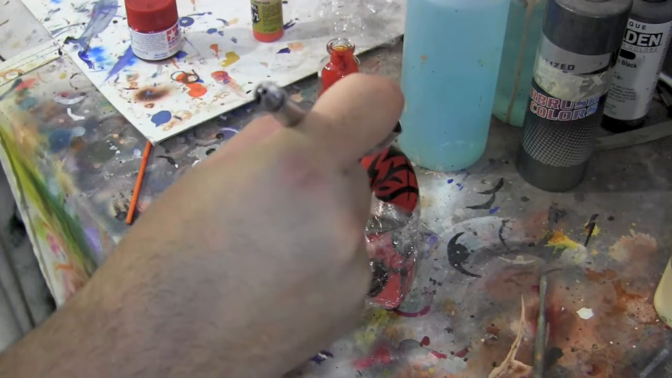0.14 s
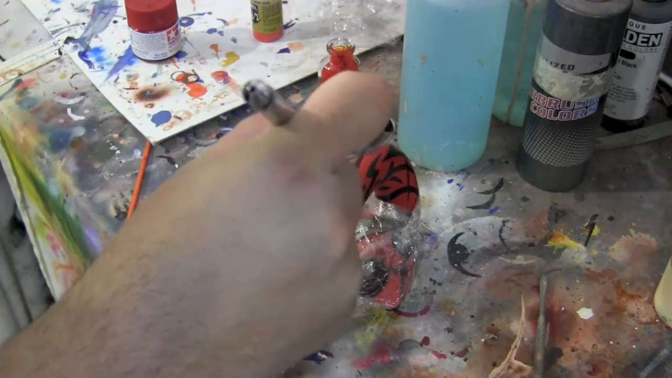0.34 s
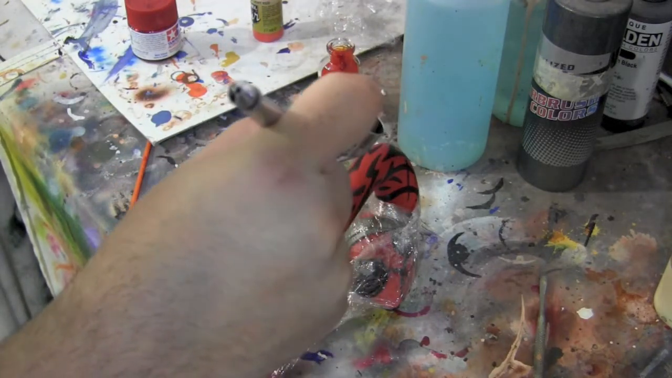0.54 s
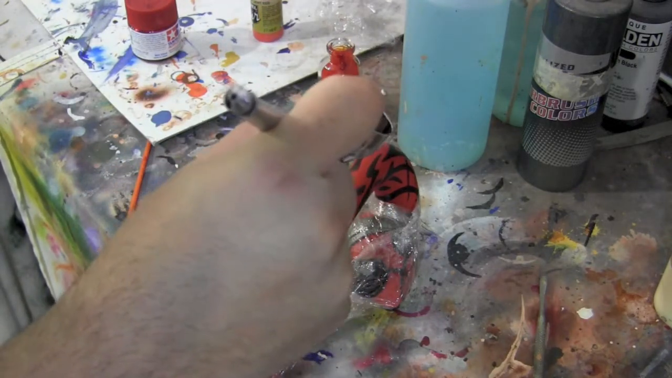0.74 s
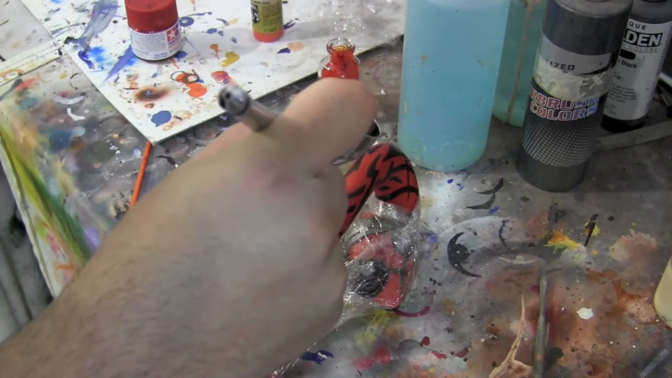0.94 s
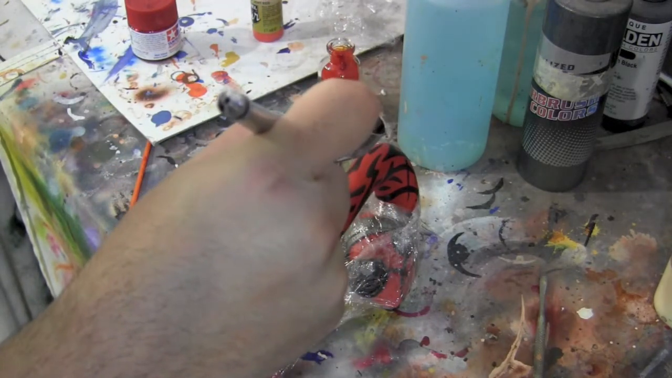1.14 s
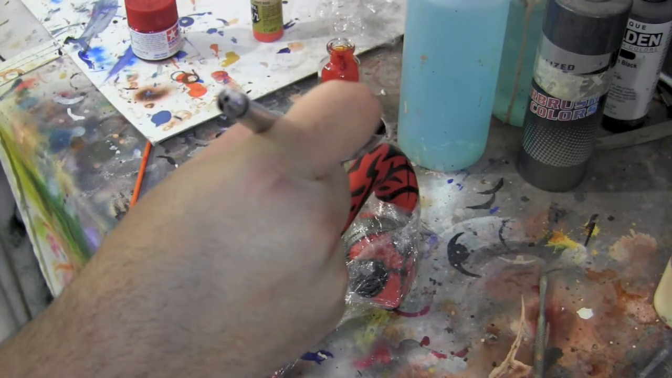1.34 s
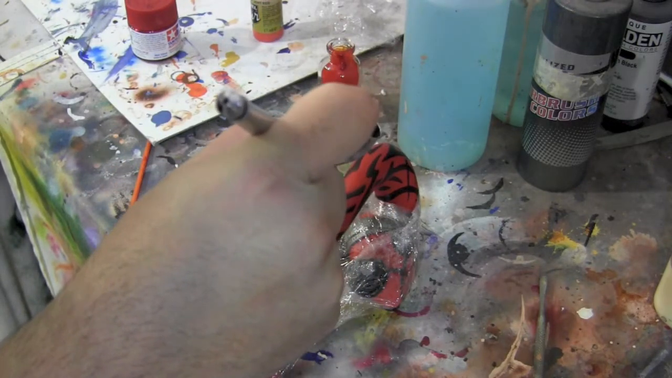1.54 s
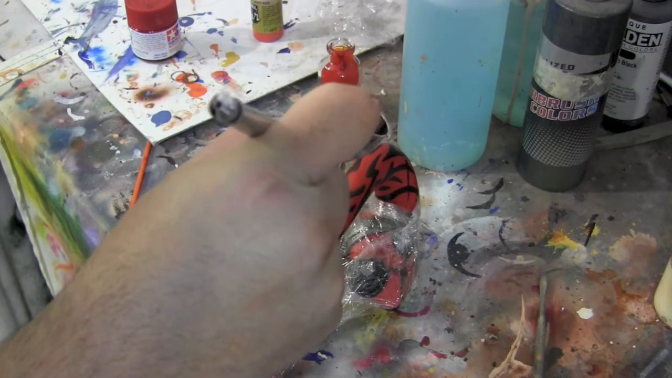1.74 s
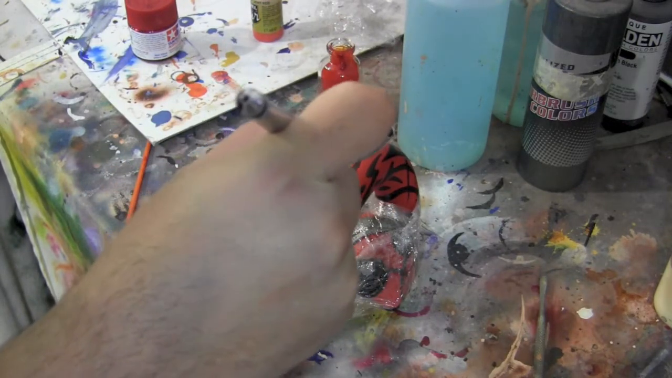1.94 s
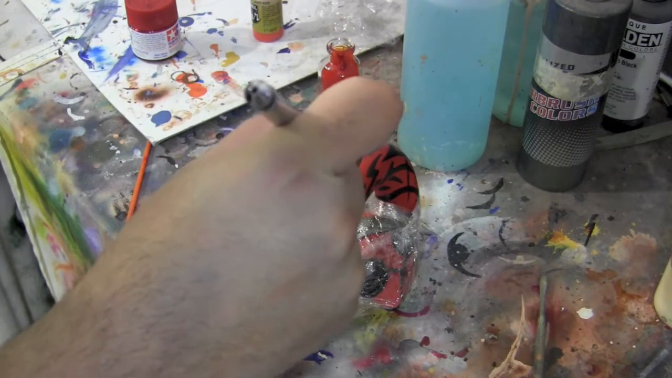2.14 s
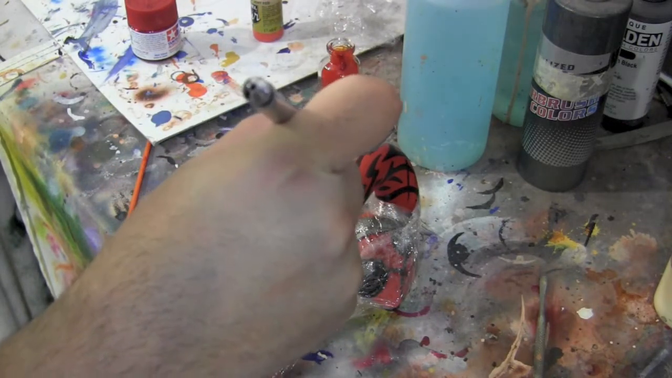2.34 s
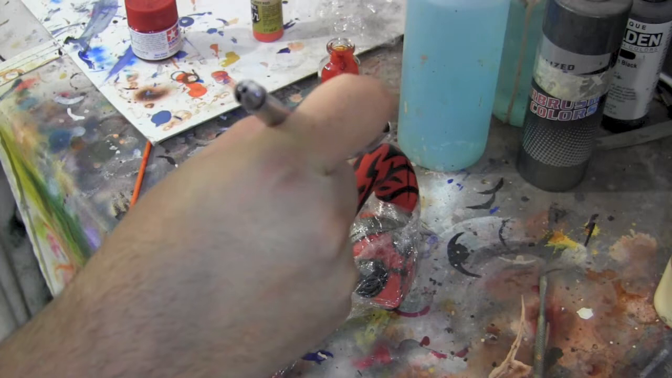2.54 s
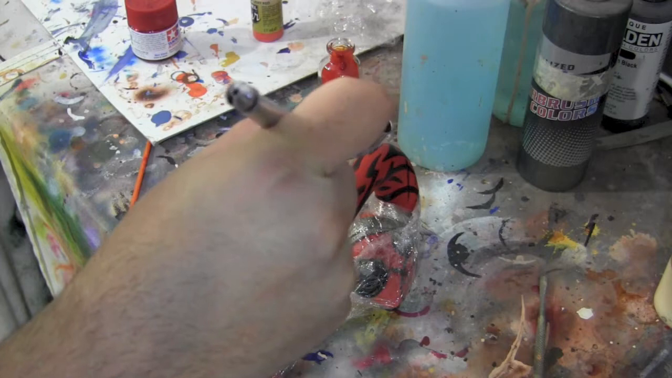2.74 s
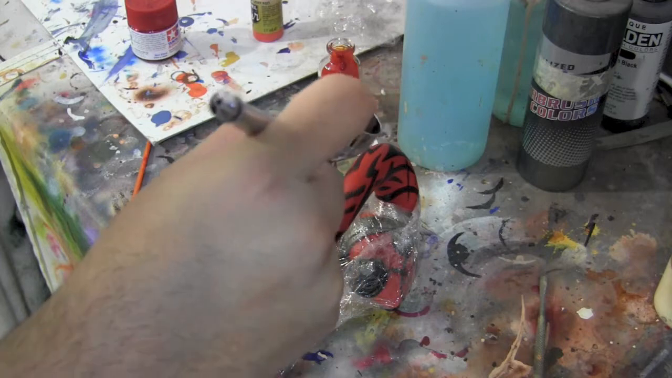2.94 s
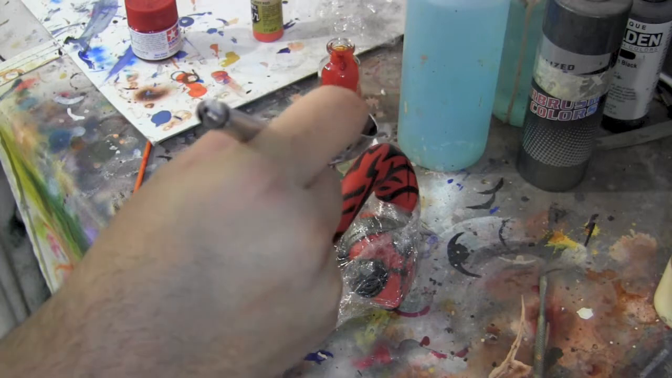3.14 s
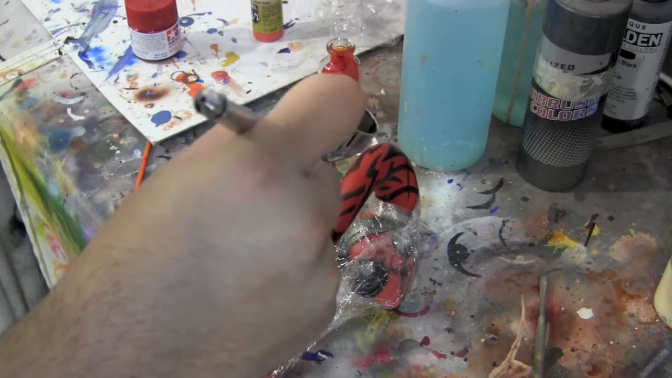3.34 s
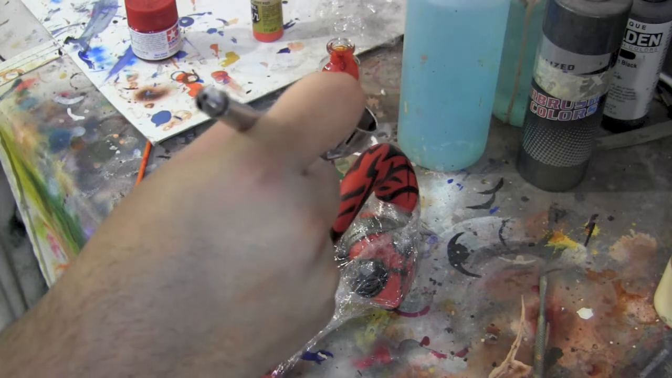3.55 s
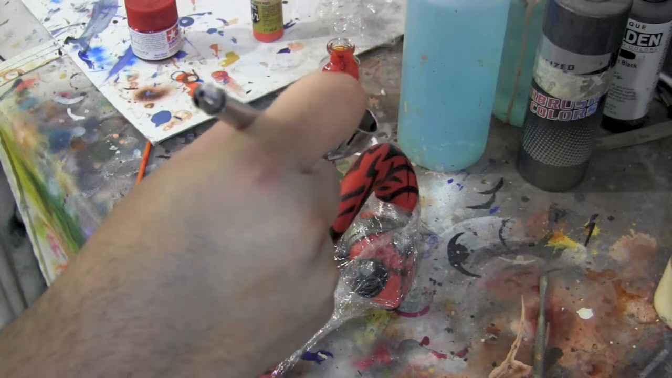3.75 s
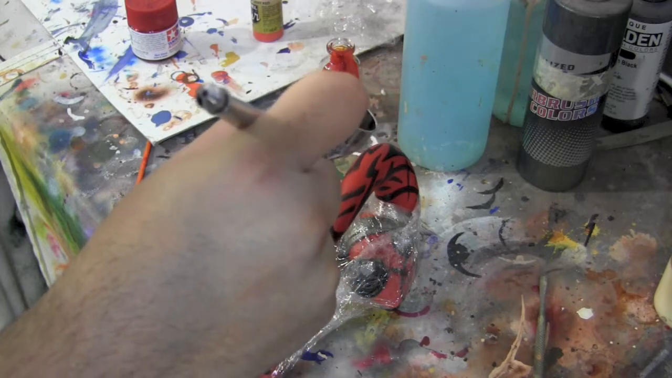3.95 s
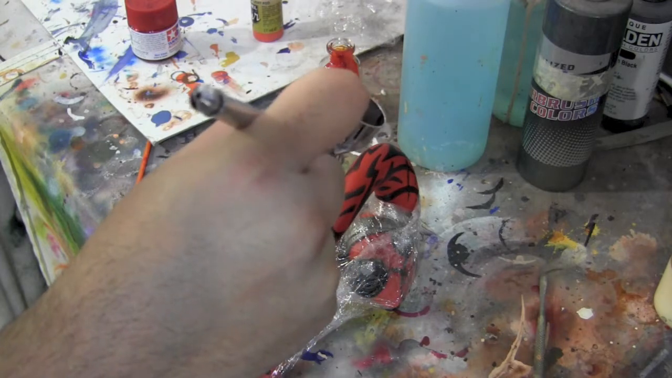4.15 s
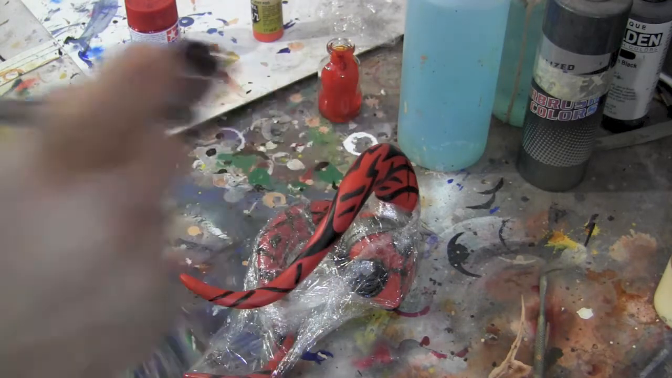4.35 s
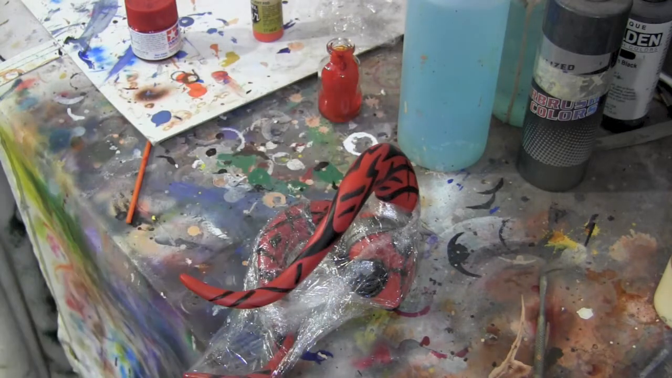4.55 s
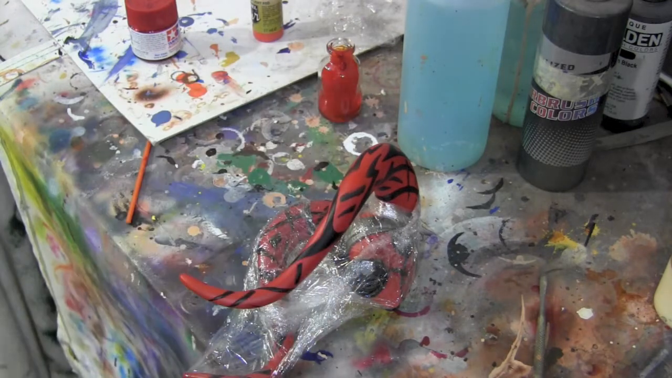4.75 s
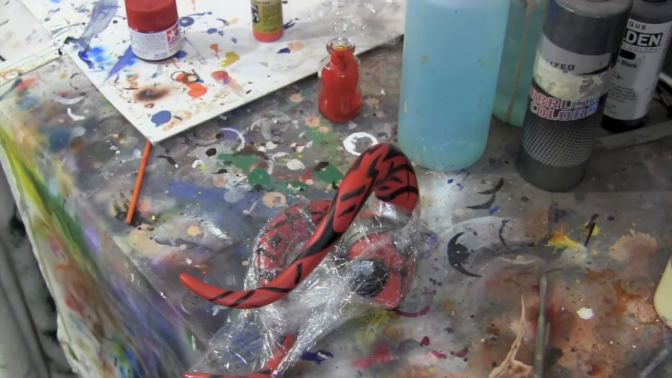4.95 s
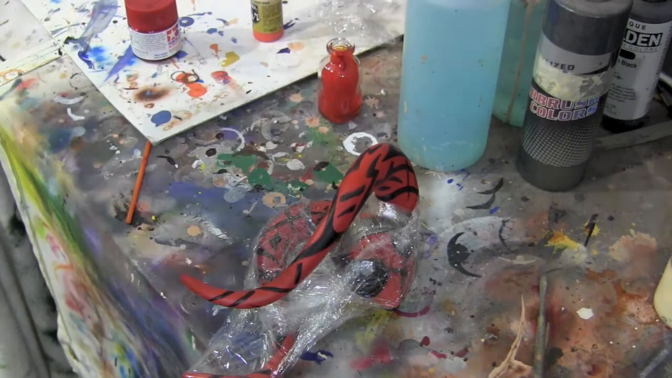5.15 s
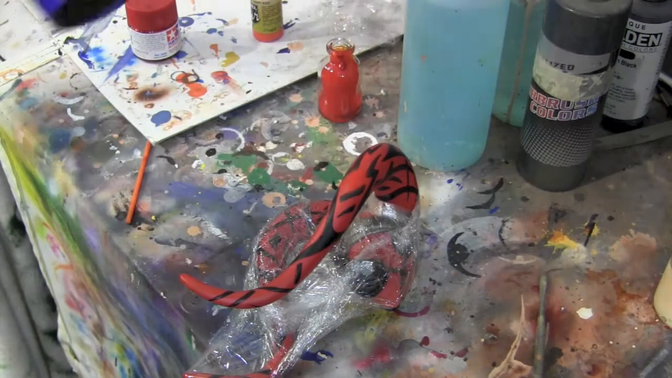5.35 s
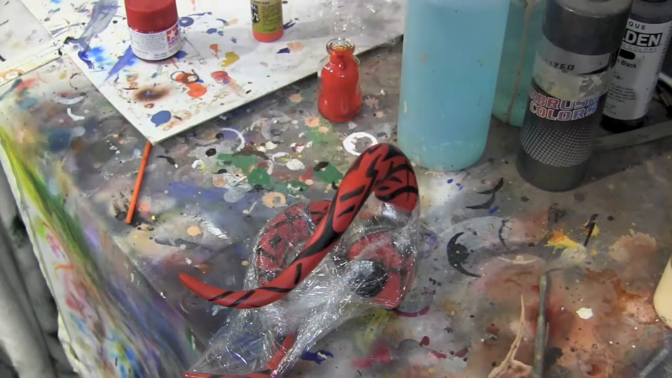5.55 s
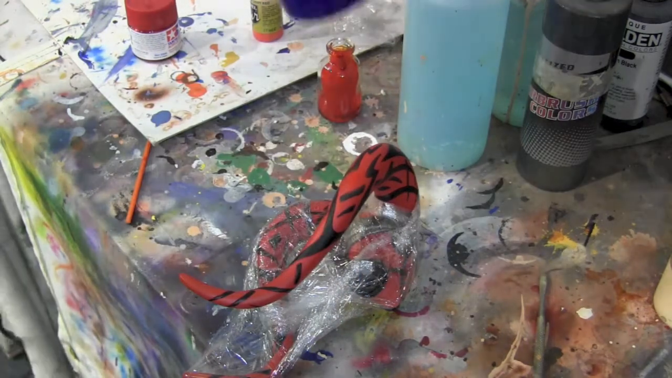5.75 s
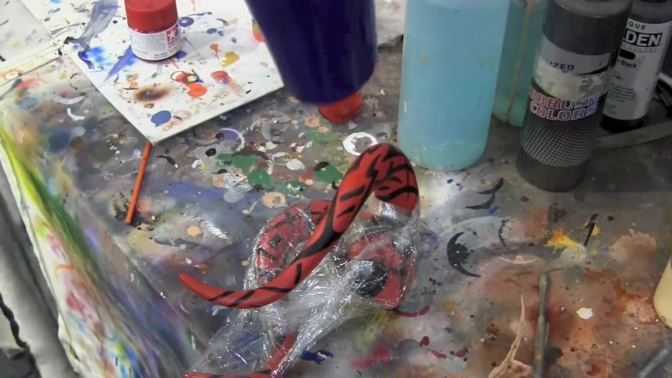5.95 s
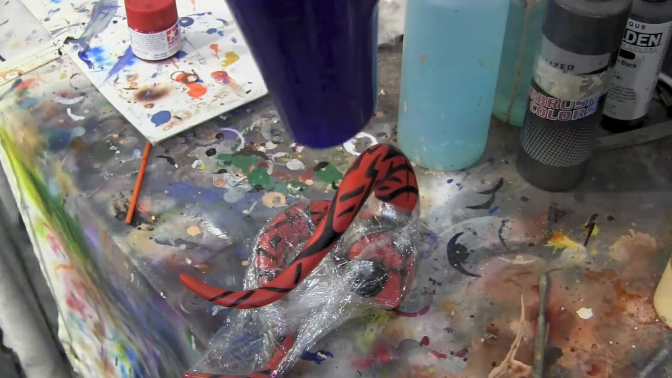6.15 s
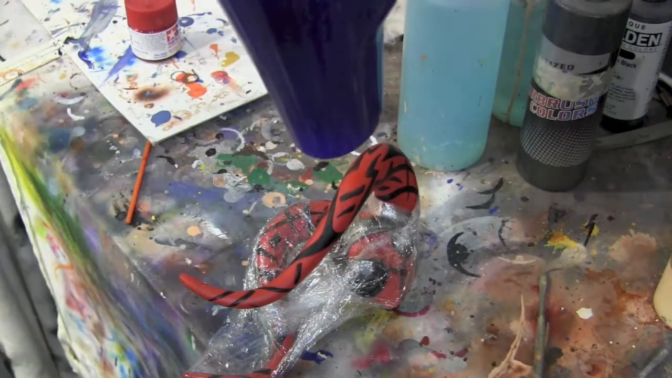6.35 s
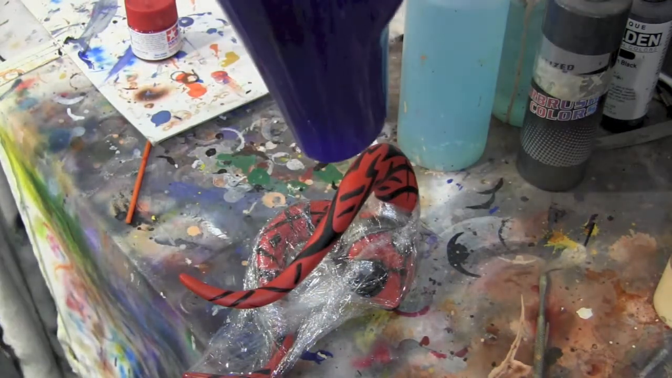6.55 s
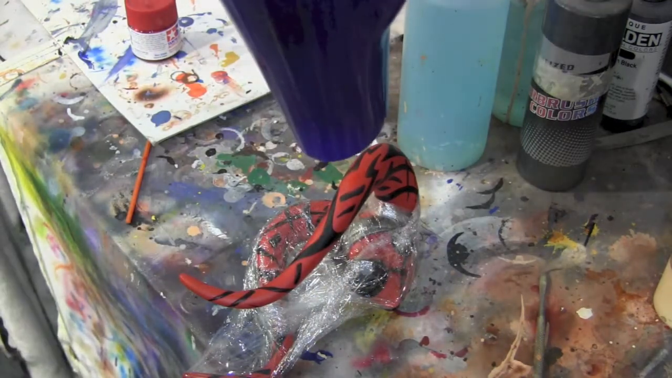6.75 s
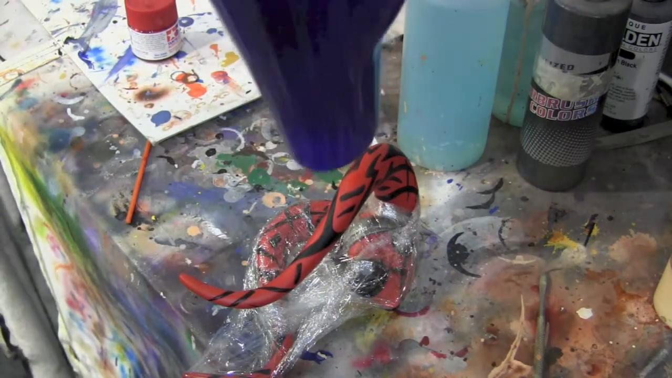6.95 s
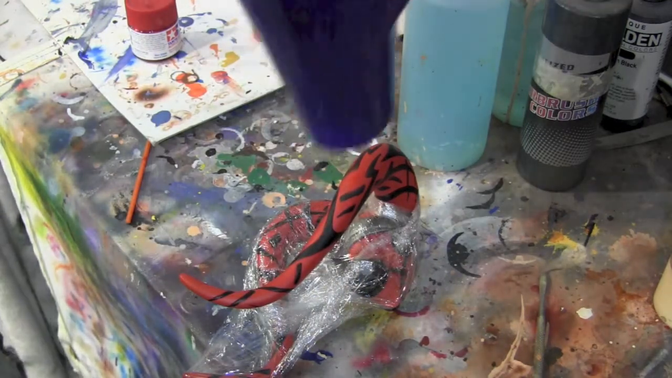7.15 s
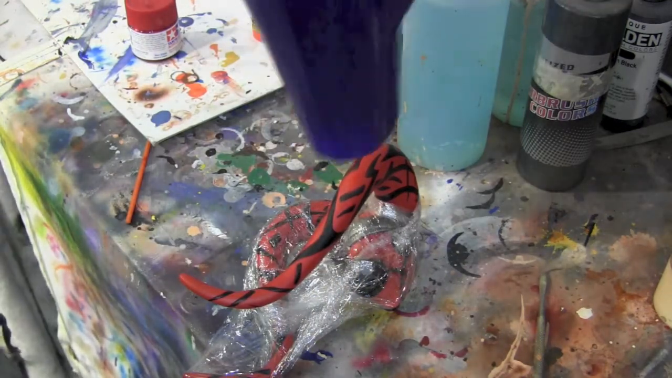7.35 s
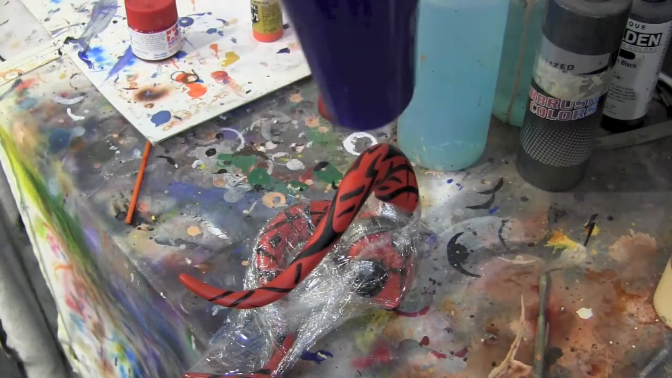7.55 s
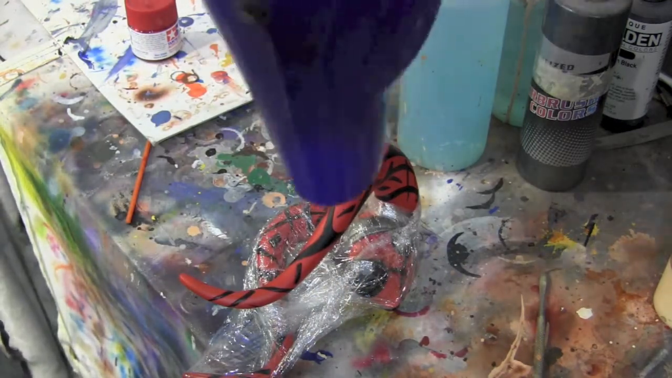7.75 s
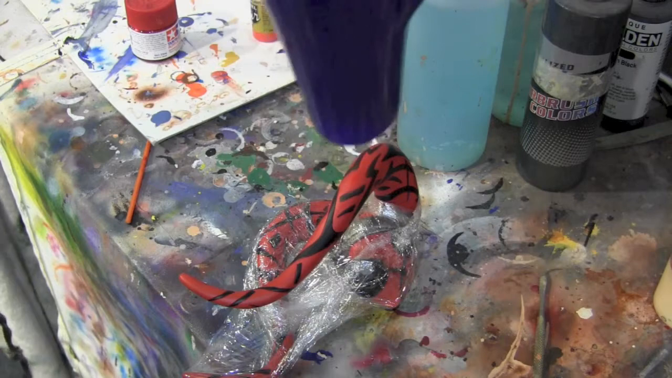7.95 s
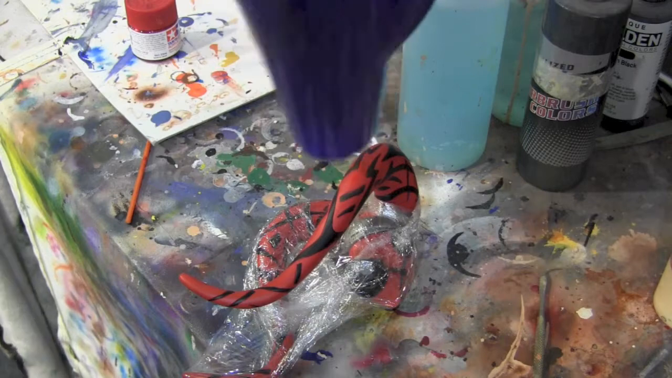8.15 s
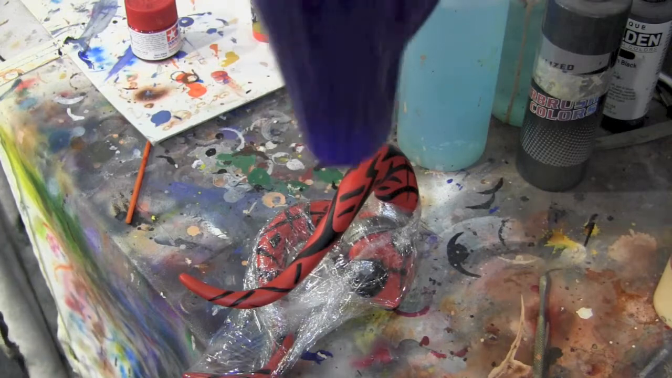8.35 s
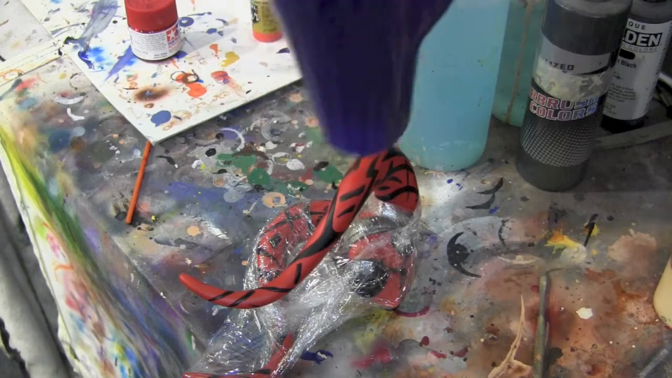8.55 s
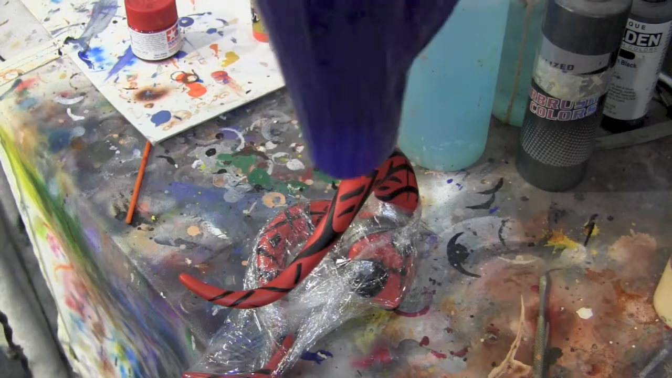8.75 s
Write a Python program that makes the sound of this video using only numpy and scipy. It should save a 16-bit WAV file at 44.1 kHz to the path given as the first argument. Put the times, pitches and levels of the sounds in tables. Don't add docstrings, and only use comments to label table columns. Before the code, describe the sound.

A small room, miked closely in stereo, with faint ventilation and hiss. From 0 to 4.2 seconds an airbrush gives twelve short spurts, each a tenth to a sixth of a second, roughly every third of a second: soft breathy puffs with thin high whistles, starting and stopping abruptly. The later ones are slightly stronger and hissier. At 2.83 a tiny falling wet squeak; at 3.0 a loud, bright metallic trigger click. The spurts pause until about 3.5. At 4.3 a softer latch click, then light rustling and ticks, a small knock at 4.55 and a firmer double knock on the bench around 4.9 to 5.0. Quiet shuffling follows. At 5.86 a hollow switch clack; brushes scrape scratchily while a motor winds up within a second. By 7 a hair dryer blows at a loud, steady roar, broad air rush with a blade whine near 1200 hertz, slightly fuller toward the end at about 9.

```python
import sys
import numpy as np
from scipy import signal
from scipy.fft import rfft, irfft, next_fast_len
from scipy.io import wavfile
from scipy.ndimage import uniform_filter1d

SR = 44100
rng = np.random.default_rng(int(sys.argv[2]) if len(sys.argv) > 2 else 0)


def makeup_ratio(level_db):
    decades = np.asarray(level_db, float) / 20
    return 10 ** decades


def log_audio(samples):
    frames = np.atleast_2d(samples).T
    limited = np.clip(frames, -1, 1)
    pcm = np.round(limited * 32767).astype(np.int16)
    wavfile.write(sys.argv[1], SR, pcm)


N = 392049
T = np.arange(N) / SR


def level(x, db):
    return x * makeup_ratio(db) / np.sqrt(np.mean(x ** 2))


def read(table, hz):
    f, v = np.transpose(table)
    return np.interp(np.log(np.maximum(hz, 1)), np.log(f), v)


def resonance_db(hz, peaks):
    return sum(boost / (1 + (2 * (hz - centre) / width) ** 2) for centre, width, boost in peaks)


def colour(x, table, peaks=(), lo_hz=0, hi_hz=1e5):
    n = next_fast_len(len(x), True)
    f = np.fft.rfftfreq(n, 1 / SR) + 1e-3
    db = read(table, f) + resonance_db(f, peaks)
    edges = 1 / np.sqrt((1 + (lo_hz / f) ** 8) * (1 + (f / hi_hz) ** 8))
    return irfft(rfft(x, n) * makeup_ratio(db) * edges, n)[:len(x)]


def walk(rate_hz):
    knots = rng.standard_normal(int(N / SR * 200))
    joined = np.interp(T * min(rate_hz, 190), np.arange(len(knots)), knots)
    return 0.69 * uniform_filter1d(joined, int(SR / rate_hz / 2))


def glide(start_s, length_s, start_hz, end_hz):
    t = np.arange(int(length_s * SR)) / SR
    hz = start_hz + (end_hz - start_hz) * t / length_s
    return int(start_s * SR), np.sin(np.pi * t / length_s), 2 * np.pi * np.cumsum(hz) / SR


def strike(events, modes, contact_s, rattle_s, rattle):
    out, t = np.zeros(N), np.arange(SR // 3) / SR
    push = np.hanning(int(contact_s * SR) + 3)
    chance = rng.standard_normal((len(events), len(modes) + len(t)))
    for (start_s, db), row in zip(events, chance):
        ring = np.zeros(len(t))
        for (hz, mode_db, t60_s), c in zip(modes, row):
            ring += makeup_ratio(mode_db + 0.44 * c) * np.sin(2 * np.pi * hz * t) * 1000. ** (-t / t60_s)
        force = rattle * row[len(modes):] * 1000. ** (-t / rattle_s)
        force[0] = 1
        ring = signal.fftconvolve(np.convolve(ring, push), force)[:len(t)]
        a = int(start_s * SR)
        out[a:a + len(t)] += makeup_ratio(db) * ring / np.abs(ring).max()
    return out


def snap(events, table, t60_s):
    out, t = np.zeros(N), np.arange(2048) / SR
    for start_s, db in events:
        crack = colour(rng.standard_normal(len(t)), table) * 1000. ** (-t / t60_s)
        crack *= np.clip(t / 0.00017, 0, 1)
        a = int(start_s * SR)
        out[a:a + len(t)] += makeup_ratio(db) * crack / np.abs(crack).max()
    return out


def small_part(x):
    return signal.sosfilt(signal.butter(6, 1900, "high", fs=SR, output="sos"), x)


# pitch_hz, level_db (per Hz)
ROOM_TONE = [(15, -45), (25, -44), (132, -1), (178, -5.5), (368, -4.5), (469, -5.5), (1240, -9),
             (1620, -11.5), (1800, -9), (4140, -14), (4870, -16), (5720, -15.5), (15500, -28.5)]
# pitch_hz, level_db
HUM = [(60, -82), (133, -78)]
# pitch_hz, side_db (re mid)
TONE_WIDTH = [(60, -3), (110, -4), (200, 2.5), (380, 1.5), (700, 0.5), (1290, -2.5), (2380, -5), (4400, -7),
              (8120, -5.5), (15000, 2)]


def room_tone():
    mid, side = (level(colour(rng.standard_normal(N), ROOM_TONE) * makeup_ratio(1.2 * walk(3.3)), -62) for _ in range(2))
    hum = sum(makeup_ratio(db + 1.3 * walk(5)) * np.sin(2 * np.pi * hz * T) for hz, db in HUM)
    return mid + hum, colour(side, TONE_WIDTH)


# open_s (valve fully open), held_s, hiss_db, ring_db (of the figure, re hiss), opening_s
PRESSES = [(0.0, 0.062, -45, 6.5, .01), (0.306, 0.13, -45, 2.5, 0.018), (0.735, 0.11, -45.5, 4, .016),
           (1.059, 0.115, -44.5, 1, 0.0082), (1.409, 0.11, -45, -1, 0.011), (1.741, 0.11, -46, 0.5, 0.013),
           (2.163, 0.12, -45.5, 0, 0.013), (2.441, 0.17, -45.5, -2, 0.0067), (2.827, 0.14, -43, -11, 0.01),
           (3.467, 0.126, -44, -6, 0.024), (3.746, 0.17, -42.5, -10, 0.016),
           (4.073, 0.15, -42.5, -23, 0.016)]


def presses():
    opening_db, shut_db_per_s, top_shut_db_per_s = 23, 900, 300
    swell_db_per_s, top_swell_db_per_s, ring_fade_db_per_s, splash_fade_db_per_s = 12, 2, 48, 14
    out = np.full((4, N), -150.)
    for open_s, held_s, db, ring_db, opening_s in PRESSES:
        a = max(int((open_s - 2 * opening_s) * SR), 0)
        b = int((open_s + held_s + .05) * SR)
        t = T[a:b] - open_s
        along = np.clip(t, 0, held_s) - held_s / 2
        late = np.maximum(t - held_s, 0)
        jet = db + opening_db * np.minimum(t / opening_s, 0) - shut_db_per_s * late + swell_db_per_s * along
        splash = jet + 3.5 + 0.053 * ring_db - splash_fade_db_per_s * along
        ring = jet + ring_db - ring_fade_db_per_s * along
        top = jet + 3 + top_swell_db_per_s * along - top_shut_db_per_s * late
        out[:, a:b] = [jet, splash, ring, top]
    return out


# pitch_hz, level_db (per Hz)
SPRAY = [(59, -58), (100, -14), (205, -21), (362, -5), (476, -8.5), (742, 2), (1430, -6.5), (1590, -13.5),
         (2270, -5.5), (3320, -10), (3690, -8.5), (8050, -11), (10600, -13), (13900, -13.5), (15500, -36)]


def jet():
    noise = rng.standard_normal((3, N))
    splash = level(colour(noise[0], SPRAY, hi_hz=1620), 0) * makeup_ratio(0.22 * walk(60))
    ring = level(colour(noise[0], SPRAY, lo_hz=1480, hi_hz=2320), 0) * makeup_ratio(1.7 * walk(55))
    hiss = level(colour(noise[1], SPRAY, lo_hz=2560, hi_hz=8600), 0) * makeup_ratio(1.0 * walk(90))
    top = level(colour(noise[2], SPRAY, lo_hz=8500), 0) * makeup_ratio(1.1 * walk(82))
    return np.sum(makeup_ratio(presses()) * [hiss, splash, ring, top], axis=0)


# start_s, length_s, start_hz, end_hz, level_db
WHISTLES = [(0.018, 0.066, 7000, 7200, -43), (0.325, 0.11, 6730, 6950, -45),
            (0.781, 0.071, 6800, 7700, -41), (1.06, 0.062, 6900, 7300, -43),
            (1.458, 0.044, 6940, 7000, -49), (1.76, 0.1, 8500, 8800, -51), (2.19, 0.094, 9300, 9200, -44),
            (2.44, 0.047, 8850, 9200, -44), (2.496, .08, 6300, 6070, -43.5), (2.87, 0.1, 8800, 9000, -46),
            (3.484, .09, 8600, 8600, -49), (3.516, .07, 3700, 3810, -55), (3.764, 0.18, 10660, 10400, -43),
            (4.1, 0.081, 8500, 8500, -44), (4.141, 0.1, 3770, 3700, -57), (4.09, 0.137, 10400, 10500, -40),
            (3.47, .12, 12800, 12800, -49), (4.662, 0.043, 2410, 2370, -66), (5.824, .03, 700, 810, -56)]


def whistles():
    out = np.zeros(N)
    breath = rng.standard_normal(N) + 1j * rng.standard_normal(N)
    breath = uniform_filter1d(uniform_filter1d(breath, size=40), size=40)
    for start_s, length_s, start_hz, end_hz, db in WHISTLES:
        a, swell, turn = glide(start_s, length_s, start_hz, end_hz)
        b = a + len(turn)
        out[a:b] += swell * level(np.real(breath[a:b] * np.exp(1j * turn)), db)
    return out


# start_s, length_s, start_hz, end_hz, level_db, octave_db
SQUEAKS = [
    (2.824, 0.014, 5000, 4500, -30, -7),
    (2.84, .016, 4760, 4650, -38, -20),
    (2.849, 0.016, 3520, 2730, -33.5, -14),
]


def squeaks():
    out = np.zeros(N)
    for start_s, length_s, start_hz, end_hz, db, octave_db in SQUEAKS:
        a, swell, turn = glide(start_s, length_s, start_hz, end_hz)
        tone = np.sin(turn) + makeup_ratio(octave_db) * np.sin(2 * turn)
        out[a:a + len(turn)] += makeup_ratio(db) * swell * tone
    return out


# start_s, level_db (peak)
TRIGGER = [
    (3.0072, -9.5),
]
# pitch_hz, level_db (per Hz)
TRIGGER_SNAP = [(470, -58), (800, -30), (1640, -20), (2180, 0), (2730, -13), (3290, 1), (5670, -29),
                (7540, -19), (12500, -15), (15500, -22)]
# pitch_hz, level_db, t60_s
TRIGGER_MODES = [(2280, -3, .1), (2600, -6, .05), (3290, 0, .1), (4100, -6, .06), (8530, -14, .3)]


def trigger():
    ring = strike(TRIGGER, TRIGGER_MODES, contact_s=.00005, rattle_s=0.013, rattle=0.34)
    return small_part(snap(TRIGGER, TRIGGER_SNAP, 0.014) + makeup_ratio(-24) * ring)


# start_s, level_db (peak)
LATCH = [
    (4.309, -23.5),
]
# pitch_hz, level_db (per Hz)
LATCH_SNAP = [(470, -54), (800, -22), (1510, -19), (2160, 1), (4480, -7), (5890, -9), (7000, -25),
              (7540, -11), (10300, -16), (15500, -25)]
# pitch_hz, level_db, t60_s
LATCH_MODES = [(2030, 6, 0.075), (2850, -6, .05), (6000, -7, .04)]


def latch():
    ring = strike(LATCH, LATCH_MODES, contact_s=.00005, rattle_s=0.018, rattle=.2)
    return small_part(snap(LATCH, LATCH_SNAP, 0.019) + makeup_ratio(-15) * ring)


# start_s, level_db
HANDLING = [(4.36, -72), (4.44, -72), (4.48, -58), (4.66, -64), (4.88, -64.5), (5.17, -67.5), (5.4, -64),
            (5.72, -65), (5.86, -58)]
# pitch_hz, level_db (per Hz)
SHUFFLE = [(100, -20), (250, 7), (500, 5), (900, 6), (1500, 1), (2500, 0), (5000, -6), (10000, -32)]


def shuffle():
    start_s, db = np.transpose(HANDLING)
    grains = level(colour(rng.standard_normal(N), SHUFFLE) * makeup_ratio(1.7 * walk(49)), 0)
    return grains * makeup_ratio(np.interp(T, start_s, db, -120, -120))


# start_s, level_db (peak)
KNOCKS = [
    (4.553, -36.5),
    (4.907, -26.5),
    (4.994, -31.5),
    (5.03, -54),
]
# pitch_hz, level_db, t60_s
BENCH_MODES = [(199, 0, 0.05), (260, 8, 0.035), (355, 2, 0.033), (430, 11, 0.022), (580, 1, 0.044),
               (810, 7, 0.024), (1100, -14, .03), (1530, -18, .03)]
# start_s, level_db (peak)
TICKS = [(4.453, -45), (4.504, -44), (4.554, -37.5), (4.602, -40), (4.908, -28.5), (4.994, -51),
         (5.195, -47), (5.606, -46), (5.627, -52), (5.862, -38), (5.903, -50), (5.921, -38)]
# pitch_hz, level_db (per Hz)
TICK_SNAP = [(150, -24), (500, 11), (1500, 15), (2500, 7), (5000, -6), (9000, -28), (15000, -34)]


def bench():
    knocks = strike(KNOCKS, BENCH_MODES, contact_s=0.00022, rattle_s=0.19, rattle=.04)
    return knocks + snap(TICKS, TICK_SNAP, 0.013)


# start_s, level_db (peak)
SWITCH = [
    (5.861, -28.5),
]
# pitch_hz, level_db, t60_s
SWITCH_MODES = [(520, -18, .06), (760, 19, 0.21), (1570, -25, .03), (3400, -32, .04), (5000, -16, .02)]


def switch():
    return strike(SWITCH, SWITCH_MODES, contact_s=0.00033, rattle_s=0.034, rattle=0.073)


START_S = 5.88


def rotor_speed():
    run_up_s = .248
    return 1 - np.exp(-np.maximum(T - START_S, 0) / run_up_s)


# start_s, length_s, level_db
SCRAPES = [(5.863, .012, -52), (5.893, .012, -52), (5.917, .007, -44), (5.942, .006, -47),
           (5.952, .014, -46), (5.977, .01, -43), (6.007, .012, -41), (6.026, .008, -42), (6.06, .042, -38)]
# pitch_hz, level_db (per Hz)
SCRAPE = [(350, -25), (700, 9), (1500, -8), (3300, 3), (4600, -3), (5700, -23), (8600, -17), (12000, -22)]
# pitch_hz, width_hz, boost_db
SCRAPE_RINGS = [(3300, 300, 1.5), (4500, 250, 2), (7200, 250, 11), (8700, 700, 7)]


def brushes(share):
    fade_s = .19
    push = makeup_ratio(-39) * np.sqrt(share) * np.exp(-((T - START_S) / fade_s) ** 2)
    for start_s, length_s, db in SCRAPES:
        push = push + makeup_ratio(db) * np.clip(1.5 - 3 * np.abs(T - start_s - length_s / 2) / length_s, 0, 1)
    return push * level(colour(rng.standard_normal(N) * makeup_ratio(1.8 * walk(150)), SCRAPE, SCRAPE_RINGS), 0)


# start_s, gain_db
NEARNESS = [(5.87, -1), (6.05, -4), (6.25, -2.5), (6.5, -1), (7.0, 0.15), (7.4, 0), (7.8, 0.8), (8.22, 1.1),
            (8.55, 1), (8.89, 1)]


def layer(share, db, power, near_share):
    near_db = np.interp(T, *np.transpose(NEARNESS))
    return makeup_ratio(db + near_share * near_db) * share ** power


# multiple, level_db (re roar)
SHAFT = [(1, -31), (2, -25), (4, -17), (6, -21), (9, -23), (10, -23), (17, -26), (25, -28), (28, -33)]


def shaft(share, turn):
    tones = sum(makeup_ratio(db + 3.5 * walk(20)) * np.sin(k * turn + k * k) for k, db in SHAFT)
    return (share * 172.7 / 172) ** 2 * tones


# pitch_hz, width_hz, boost_db
HOUSING = [(460, 90, 12), (560, 60, -14), (710, 190, 15), (1430, 100, 7), (2000, 400, 5)]


def motor_tones(share, turns_hz, turn):
    blades = layer(share, -27.3, 2.7, .5) * makeup_ratio(1.5 * walk(30) + 1.1 * walk(4)) * np.sin(7 * turn)
    current = share ** 1.5 * (1 - share)
    octave = layer(share, -35, 2.5, 2.5) + makeup_ratio(-20) * current * share ** 2.5
    octave = octave * makeup_ratio(resonance_db(14 * turns_hz, HOUSING))
    octave = octave * makeup_ratio(3.5 * walk(30) + 1.2 * walk(4)) * np.sin(14 * turn)
    poles = makeup_ratio(-50) * share + makeup_ratio(-25) * current * share
    poles = poles * makeup_ratio(resonance_db(5 * turns_hz, HOUSING)) * makeup_ratio(3 * walk(25)) * np.sin(5 * turn)
    return np.sqrt(2) * (blades + octave + poles)


# pitch_hz, level_db (per Hz)
AIRFLOW = [(24, -74), (40, -6), (97, -28), (166, -16.5), (259, -13.5), (348, -14.5), (444, -8), (627, 5),
           (1130, -10), (1220, -4.5), (1480, -9), (2360, -12.5), (2540, -11.5), (4940, -16.5),
           (14200, -35.5)]
# pitch_hz, width_hz, boost_db
DUCT = [(341, 51, 6), (443.5, 35, -2.5), (645, 43, -6.5), (810, 43, -2), (2070, 610, 12.5), (2893, 68, 6.5),
        (3600, 530, 2.5), (5000, 76, 4.5), (5870, 61, 8.5), (6590, 650, 3.5), (8500, 200, 3.5),
        (13500, 1900, 6.5)]


def dryer():
    share = rotor_speed()
    turns_hz = 172.7 * share
    turn = 2 * np.pi * np.cumsum(turns_hz * (1 + 0.0013 * walk(25))) / SR
    noise = rng.standard_normal((3, N)) * (1 + 0.089 * np.cos(2 * turn))
    roar = colour(noise[0] * makeup_ratio(0.48 * walk(150)), AIRFLOW, DUCT, hi_hz=1420)
    roar = level(roar, -2.5) * makeup_ratio(0.09 * walk(33)) + np.sqrt(2) * shaft(share, turn)
    middle = colour(noise[1] * makeup_ratio(1.6 * walk(150)), AIRFLOW, DUCT, lo_hz=1700, hi_hz=2380)
    middle = level(middle, -1.7) * makeup_ratio(1.0 * walk(9))
    hiss = colour(noise[2] * makeup_ratio(1.2 * walk(150)), AIRFLOW, DUCT, lo_hz=2900, hi_hz=4930)
    hiss = level(hiss, 0) * makeup_ratio(0.14 * walk(9))
    top = level(colour(noise[2], AIRFLOW, DUCT, lo_hz=5780), 0) * makeup_ratio(0.21 * walk(2.7))
    air = layer(share, -19.5, power=0.83, near_share=1) * roar
    air += layer(share, -24, power=2.7, near_share=0.28) * middle
    air += layer(share, -26, power=2.05, near_share=1.16) * hiss
    air += layer(share, -32, power=3.1, near_share=0.82) * top
    return air + motor_tones(share, turns_hz, turn) + brushes(share)


# pitch_hz, t60_s
ROOM_T60 = [(200, 0.39), (1000, 0.27), (4000, 0.24), (12000, 0.14)]


def room(x):
    t = np.arange(SR // 2) / SR
    tail = np.zeros(len(t))
    for hz in 125 * 2 ** np.arange(8):
        band = signal.butter(2, [hz / 1.414, min(hz * 1.414, 20000)], "band", fs=SR, output="sos")
        tail += signal.sosfilt(band, rng.standard_normal(len(t))) * 1000. ** (-t / read(ROOM_T60, hz))
    tail *= np.clip(t / 0.0017, 0, 1)
    return signal.fftconvolve(x, tail / np.sqrt(np.sum(tail ** 2)))[:N]


# pitch_hz, side_db (re mid)
SPRAY_WIDTH = [(60, -6), (110, -18), (200, -30), (380, -17), (700, -23), (1290, -55), (2380, -49),
               (4400, -33), (8120, -14.5), (15000, -9)]
# pitch_hz, side_db (re mid)
DRYER_WIDTH = [(60, -11), (110, -27), (200, -36), (380, -20.5), (700, -26.5), (1290, -32), (2380, -37),
               (4400, -33.5), (8120, -31.5), (15000, -20)]


def stereo_side(close, blower):
    return room(colour(close, SPRAY_WIDTH) + colour(blower, DRYER_WIDTH))


def scene():
    air, air_side = room_tone()
    spray = jet() + whistles() + squeaks()
    hands = trigger() + latch() + shuffle() + bench() + switch()
    blower = dryer()
    air_limit = signal.cheby2(6, 30, 15100, fs=SR, output="sos")
    spray, blower = signal.sosfilt(air_limit, [spray, blower])
    wet = spray * makeup_ratio(-11.5) + hands * makeup_ratio(-14.0) + blower * makeup_ratio(-20)
    mid = spray + hands + blower + room(wet)
    side = stereo_side(spray + hands, blower)
    mic_low_hz = 136
    mid, side = signal.sosfilt(signal.butter(3, mic_low_hz, "high", fs=SR, output="sos"), [mid, side])
    return np.array([mid + air + side + air_side, mid + air - side - air_side])


def top_cut(x):
    return signal.sosfilt(signal.butter(12, 15630, fs=SR, output="sos"), x)


def record(dry):
    return top_cut(dry)


dry = scene()
out = record(dry)
log_audio(out)
```